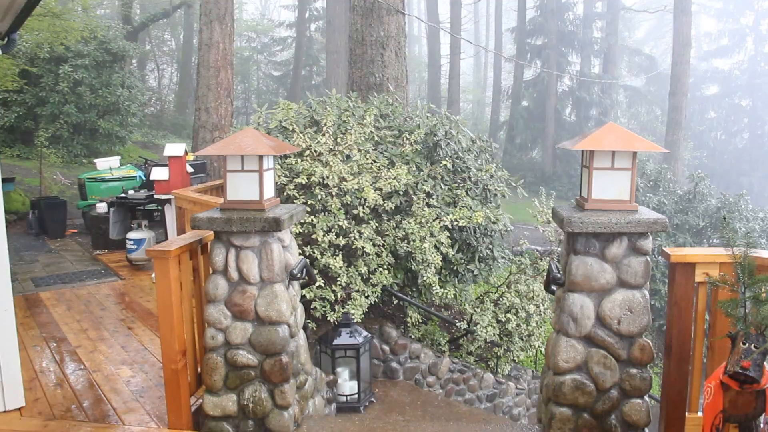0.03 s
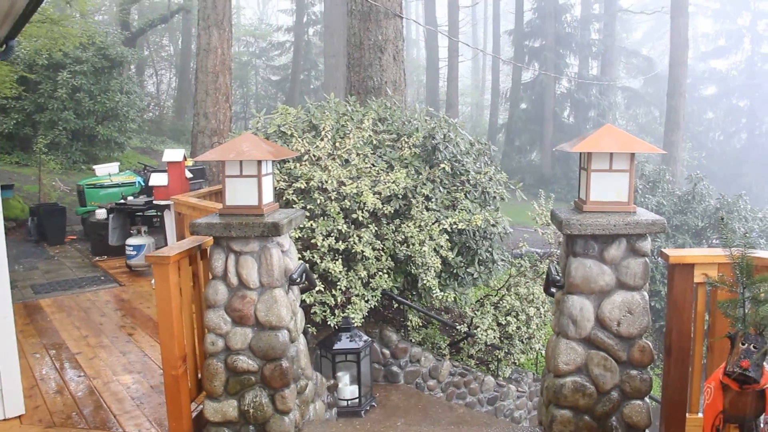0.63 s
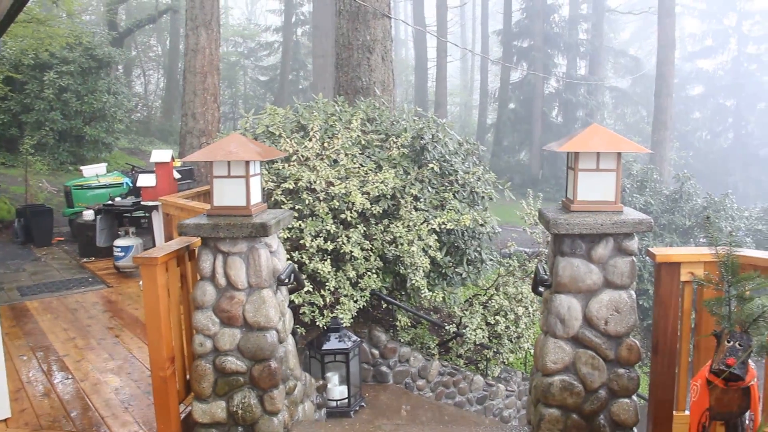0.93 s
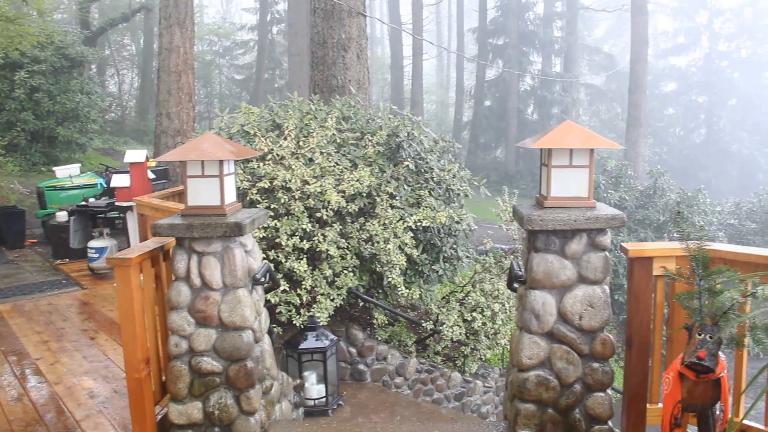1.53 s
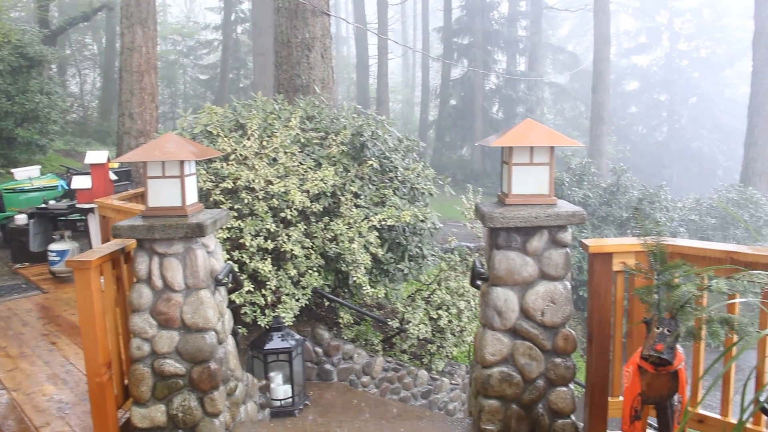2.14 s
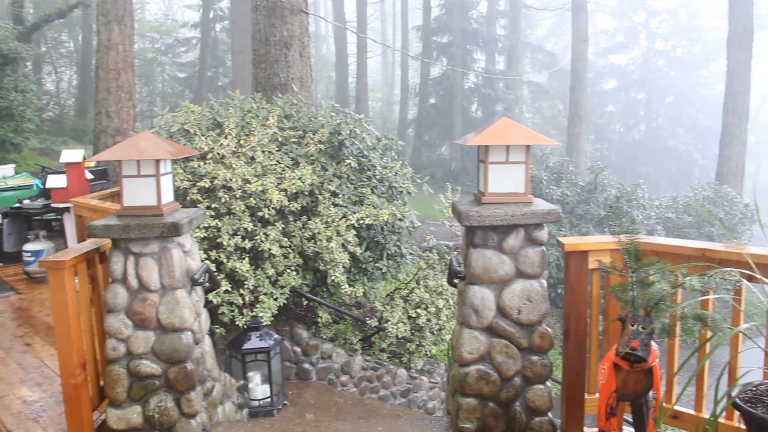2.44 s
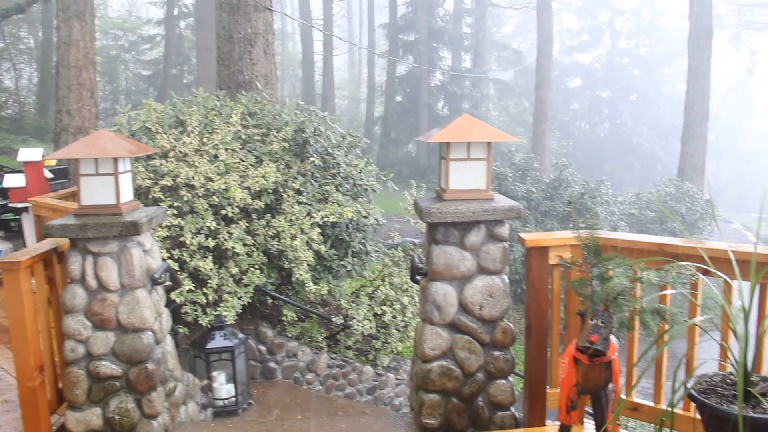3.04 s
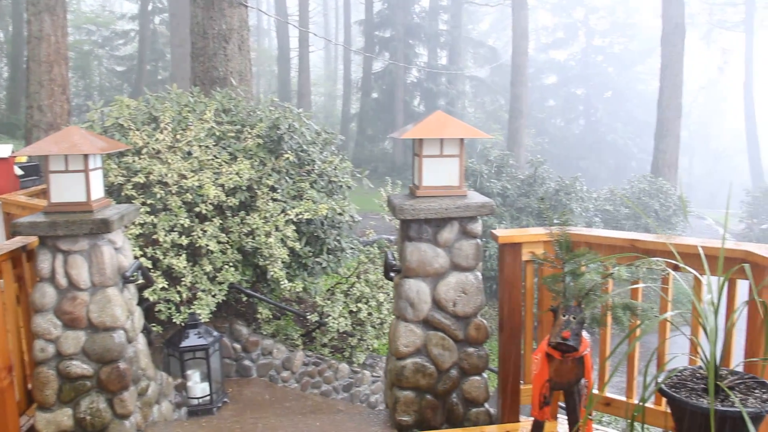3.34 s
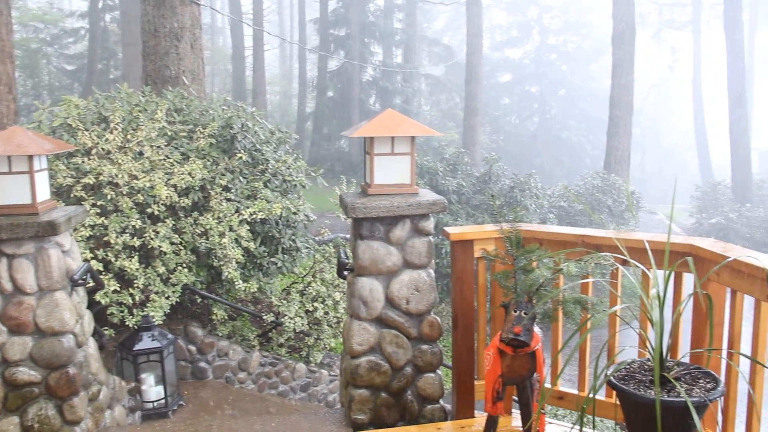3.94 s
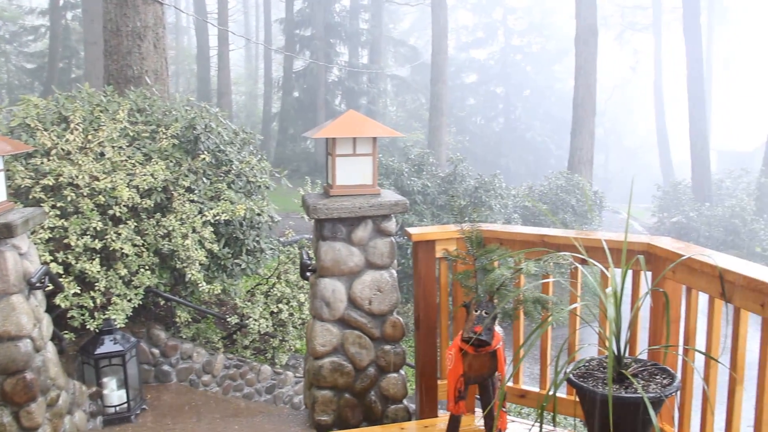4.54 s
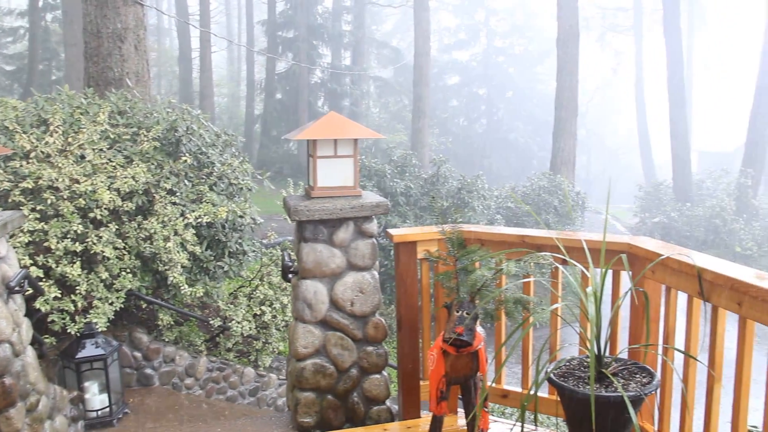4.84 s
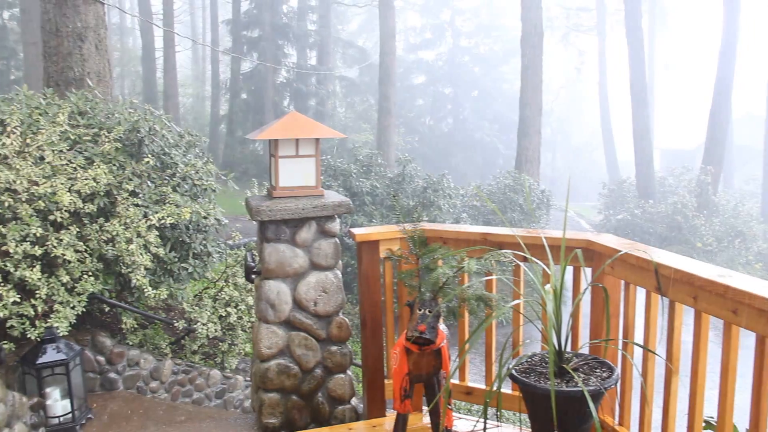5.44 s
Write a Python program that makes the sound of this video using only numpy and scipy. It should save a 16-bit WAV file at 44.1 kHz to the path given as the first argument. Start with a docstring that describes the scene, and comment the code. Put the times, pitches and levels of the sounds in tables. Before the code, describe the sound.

Heavy drips smack wet deck boards over pattering rain on leaves and stone, with occasional brief pings on thin metal.

```python
"""Steady rain on a forest garden, one microphone at the covered edge of a wooden deck.
From the start, far rain is a soft wash and nearer drops patter on leaves and stone. Big drips smack the
boards close by, each thrown back by the wall and the porch. The sharpest comes at 0.56 s; a limiter
ducks the rain after it and after later hard hits. At about 3.8, 4.5 and 5 s a drip pings on thin metal."""
import sys
import numpy as np
from scipy import signal
from scipy.fft import rfft, irfft
from scipy.io import wavfile
from scipy.ndimage import uniform_filter1d, minimum_filter1d

SR = 44100
rng = np.random.default_rng(int(sys.argv[2]) if len(sys.argv) > 2 else 0)


def master_out(mix):
    """Clip the mix to full scale and print it as 16-bit PCM to the path in sys.argv[1]."""
    frames = np.transpose(np.atleast_2d(mix))
    ceiling = np.clip(frames, -1, 1)
    pcm = np.round(ceiling * 32767).astype(np.int16)
    wavfile.write(sys.argv[1], SR, pcm)


N = 242550

# big drips close to the microphone, ahead of the limiter:
# (time [s], peak level [dB], centre [Hz], width [octaves], starting rms of spray and porch tail [dB])
CLOSE_DRIPS = [ (.225, -10, 7500, 0.76, -24), (.259, -7, 8500, .6, -23.5), (0.301, -4, 5400, .65, -24),
               (.518, -9, 7500, .4, -25), (.5505, -6, 7700, .4, -43), (.5606, 2.5, 4200, 0.53, -13.5),
               (0.8368, -8, 4900, .35, -25), (1.022, -6, 5200, 0.45, -27), (1.226, -1, 7800, 0.3, -29),
               (1.2632, -3, 9700, 0.37, -25), (1.7117, -8, 8150, .25, -23), (1.8882, -8, 6100, .7, -26),
               (1.92, -6, 5800, .7, -26), (1.9873, 2, 7350, 0.21, -18), (2.1045, -8, 5560, 0.28, -26),
               (2.3228, 0.6, 9300, 0.38, -22.5), (2.804, -3, 6500, .65, -22.5),
               (2.8723, -11, 6200, .5, -23.5), (2.973, -6, 7600, .6, -23), (3.025, -4, 8000, .6, -29),
               (3.2874, -7, 6200, 0.53, -21.5), (3.3271, -6, 4460, .3, -24), (3.6592, -4, 7100, .32, -28),
               (3.753, -6, 5000, .7, -18), (3.8908, 0, 7460, 0.41, -24), (4.001, -13, 3200, 0.65, -21),
               (4.022, -1, 6700, 0.72, -24), (4.1413, -14, 7500, .5, -25), (4.19, -4, 5700, 0.53, -32),
               (4.3785, -6, 8000, 0.49, -26), (4.4816, -1, 9500, 0.22, -23), (4.8857, -9, 5600, .25, -28),
               (4.913, -4, 9550, 0.29, -28), (5.06, -7.5, 8950, 0.16, -28), (5.2055, -10, 5800, 0.5, -30),
               (5.4277, -4, 5700, 0.54, -29)]
# drips on thin metal: (time [s], level added to every mode [dB])
METAL_HITS = [(3.761, 2.5), (4.498, -8.5), (5.012, -6)]
# modes of that metal: (frequency [Hz], level [dB], time to fall 60 dB [s])
METAL_MODES = [(2900, -22, .16), (2980, -18, 0.15), (3220, -24, 0.26), (3150, -24, .14),
               (3670, -20.5, 0.098), (7865, -27, .11)]
# tone of the small drops in the middle distance: (frequency [Hz], relative level [dB])
PATTER_SPECTRUM = [(300, -20), (1000, -2.5), (2500, 0.5), (5000, -2.5), (8500, 0), (12000, -7),
                   (16000, -12)]
# tone of the far rain on the forest: (frequency [Hz], relative level [dB])
WASH_SPECTRUM = [(20, -29), (48, -22.5), (62, -20), (100, -10.5), (160, -6.5), (250, -1.5), (325, 0.5),
                 (420, -3.5), (750, -2.5), (1300, -5.5), (3000, -12), (8000, -20), (12000, -25),
                 (16000, -32.5)]
# slow swell of the rain, applied as a share of its swing about the mean: (time [s], level [dB])
RAIN_SWELL = [(4.15, -25.5), (4.44, -26.5), (5.35, -25)]

# lesser drips are drawn between these limits: (lowest, highest)
LESSER_PEAK_DB, LESSER_SPRAY_DB = (-19, -11.5), (-33, -29.5)
LESSER_HZ, LESSER_OCTAVES = (4500, 9650), (0.18, .6)
PORCH_T60_S = .135
MIC_OPENS_S, BAND_LIMIT_HZ = .036, 16100


def big_drips():
    """Heavy drips smack the boards close to the microphone."""
    out = np.zeros(N)
    for time_s, *settings in CLOSE_DRIPS:
        add(out, time_s, drip(*settings))
    return out


def drip(peak_db, hz, octaves, spray_db, wall_db=-5, wall_s=0.0033, board_db=-11, board_s=.0017):
    """One drip: a sharp smack, quick echoes off boards and wall, and a tail of the same colour."""
    smack = impact(hz, octaves)
    board_jitter, wall_jitter = rng.uniform(-1, 1, 2)
    direct = amp(peak_db) * smack
    out = amp(spray_db) * signal.fftconvolve(spray_tail(PORCH_T60_S), smack / np.linalg.norm(smack))
    add(out, 0, direct)
    add(out, board_s + 0.00089 * board_jitter, amp(board_db) * direct)
    add(out, wall_s + 0.00039 * wall_jitter, amp(wall_db) * direct)
    return out


def impact(hz, octaves, snap_db=-13, snap_octaves=0.8, ripple_db=2.0, size=256):
    """A drop lands, peak 1: a sudden start and a few cycles around hz, coloured by the spot it hits."""
    f = np.fft.rfftfreq(size, 1 / SR) + 1
    body = np.exp(-(np.log2(f / hz) / (2 * octaves)) ** 2) / np.hypot(1, (f / (1.8 * hz)) ** 3)
    # hard spots ring little and add a snap at the very top
    snap = amp(snap_db) * (octaves / snap_octaves) ** 2 * (0.16 + f / (f + 7000))
    spot = unit(np.convolve(rng.standard_normal(len(f)), np.hanning(11), "same"))
    gain = (body + snap) * amp(ripple_db * spot)
    log_gain = np.log(np.r_[gain, gain[-2:0:-1]])
    minimum_phase = np.exp(np.conj(signal.hilbert(log_gain)))  # nothing sounds before the hit
    pulse = np.fft.ifft(minimum_phase).real
    return pulse / abs(pulse).max()


def spray_tail(t60_s, hold_s=0.0049, grain_db=5.0, size=8000):
    """Spray and scattered echoes: grainy noise that holds for a moment, then dies."""
    t = np.arange(size) / SR
    noise, grain = rng.standard_normal((2, size))
    rise = 1 - np.exp(-t / 0.00048)
    fade = np.exp(-np.log(1000) * np.maximum(t - hold_s, 0) / t60_s)
    return unit(noise * amp(grain_db * grain)) * rise * fade


def lesser_drips(per_s=15):
    """Lighter drips land at random all over the deck, each with its own size and pitch."""
    out = np.zeros(N)
    low, high = np.transpose([(0, N / SR), LESSER_PEAK_DB, LESSER_HZ, LESSER_OCTAVES, LESSER_SPRAY_DB])
    for _ in range(round(per_s * N / SR)):
        time_s, *settings = rng.uniform(low, high)
        add(out, time_s, drip(*settings))
    return out


def metal_pings(rise_s=0.0016):
    """Thin metal, struck by a drip, rings briefly in a cluster of close modes."""
    t, out = np.arange(SR // 2) / SR, np.zeros(N)
    rise = 1 - np.exp(-t / rise_s)
    for time_s, hit_db in METAL_HITS:
        for hz, mode_db, t60_s in METAL_MODES:
            ring = np.sin(2 * np.pi * (hz * t + rng.random()))
            fade = np.exp(-np.log(1000) * t / t60_s)
            add(out, time_s, amp(hit_db + mode_db) * ring * rise * fade)
    return out


def patter(level_db=-29.5, per_s=700, spread_db=3.5, largest_db=16, echo_db=-1.5, surfaces=36):
    """Middle distance: small drops on leaves, stone and wood, each surface with its pitch and echoes."""
    out = np.zeros(N)
    for hz in np.geomspace(1300, 14000, surfaces):
        lands = rng.random(N) < per_s / surfaces / SR
        sizes = amp(np.minimum(spread_db * rng.exponential(1, N), largest_db))
        path_to_mic = spray_tail(t60_s=0.064)
        path_to_mic *= amp(echo_db) / np.linalg.norm(path_to_mic)
        path_to_mic[0] += rng.choice([-1, 1])  # the direct sound
        drop = signal.fftconvolve(path_to_mic, unit(impact(hz, octaves=0.42)))
        out += signal.oaconvolve(lands * sizes, drop)[:N]
    return amp(level_db) * unit(coloured(out, PATTER_SPECTRUM))


def far_wash(level_db=-19.5, patch_depth=1.04, flicker_depth=.5):
    """Far off in the forest, countless drops merge into noise with drifting patches and a flicker."""
    framing = dict(fs=SR, nperseg=512, noverlap=384)
    hz, _, frames = signal.stft(rng.standard_normal(N), **framing)
    across_bands = uniform_filter1d(rng.standard_normal(frames.shape), size=14, axis=0)
    patches = unit(uniform_filter1d(across_bands, size=16, axis=1))
    flicker = unit(uniform_filter1d(rng.standard_normal(frames.shape[1]), size=10))
    nearness = hz / (hz + 900)  # treble comes from nearer, so it is less even
    frames *= amp(nearness[:, None] * (patch_depth * patches + flicker_depth * flicker))
    noise = signal.istft(frames, **framing)[1][:N]
    return amp(level_db) * unit(coloured(noise, WASH_SPECTRUM))


def coloured(x, spectrum):
    """Filters a signal by a spectrum table, read on a log-frequency axis."""
    hz, db = np.transpose(spectrum)
    bin_hz = np.fft.rfftfreq(len(x), 1 / SR)
    gain_db = np.interp(np.log(bin_hz + 1), np.log(hz + 1), db)
    return irfft(rfft(x) * amp(gain_db), len(x))


def amp(db):
    """Decibels to gain."""
    return 10 ** (np.asarray(db) / 20)


def unit(x):
    """Scales to rms 1."""
    return x / np.sqrt(np.mean(x ** 2) + 1e-20)


def add(mix, time_s, sound):
    """Adds a sound to the mix at time_s."""
    part = mix[max(round(time_s * SR), 0):][:len(sound)]
    part += sound[:len(part)]


def scene(swell_share=0.41):
    """At the deck's edge: drips in front, wash and patter swelling slightly behind, all in mono."""
    times_s, db = np.transpose(RAIN_SWELL)
    swell = amp(swell_share * np.interp(np.arange(N) / SR, times_s, db - np.mean(db)))
    rain = swell * (far_wash() + patter())
    mono = rain + big_drips() + metal_pings() + lesser_drips()
    return np.array([mono, mono])


def record(dry, ceiling_db=-0.8, hold_s=0.1, recovery_db_per_s=45):
    """The microphone opens; a peak limiter ducks at once, holds and recovers; the top treble is cut."""
    t = np.arange(N) / SR
    over_db = np.maximum(20 * np.log10(abs(dry).max(0) + 1e-9) - ceiling_db, 0)
    half_hold = round(hold_s * SR / 2)
    held_db = -minimum_filter1d(-over_db, 2 * half_hold + 1, origin=half_hold)
    duck_db = np.maximum.accumulate(held_db + recovery_db_per_s * t) - recovery_db_per_s * t
    limited = dry * amp(-duck_db) * (t >= MIC_OPENS_S)
    low_pass = signal.firwin(601, BAND_LIMIT_HZ, window=("kaiser", 10), fs=SR)
    return signal.oaconvolve(limited, low_pass[None], "same")


dry = scene()
out = record(dry)
master_out(out)
```